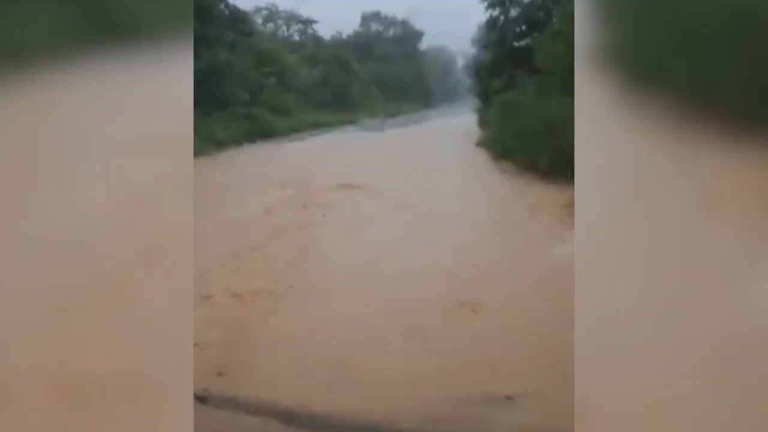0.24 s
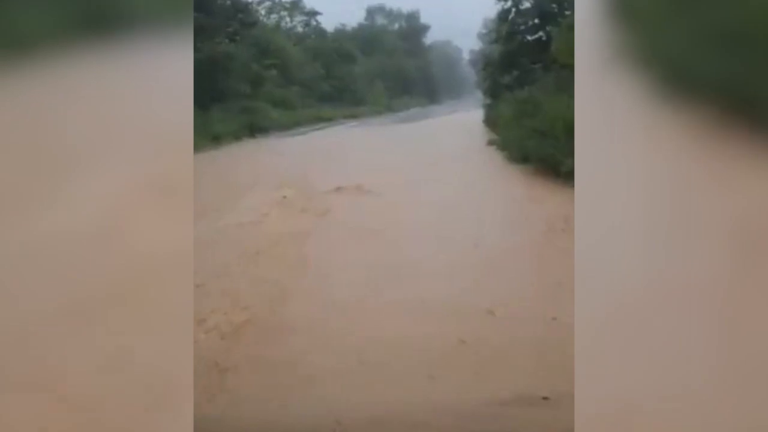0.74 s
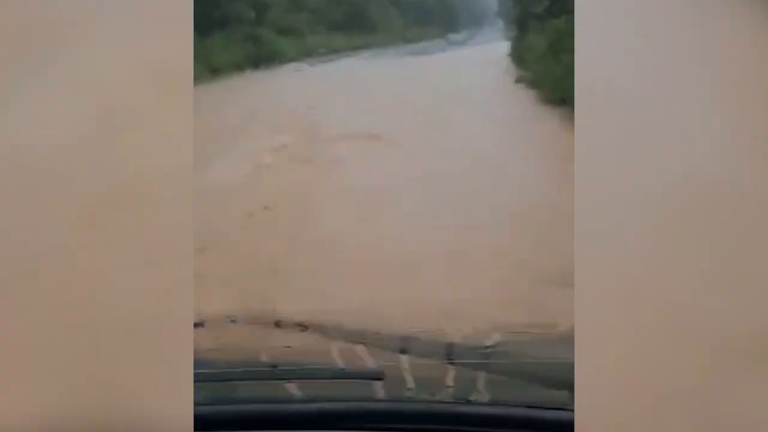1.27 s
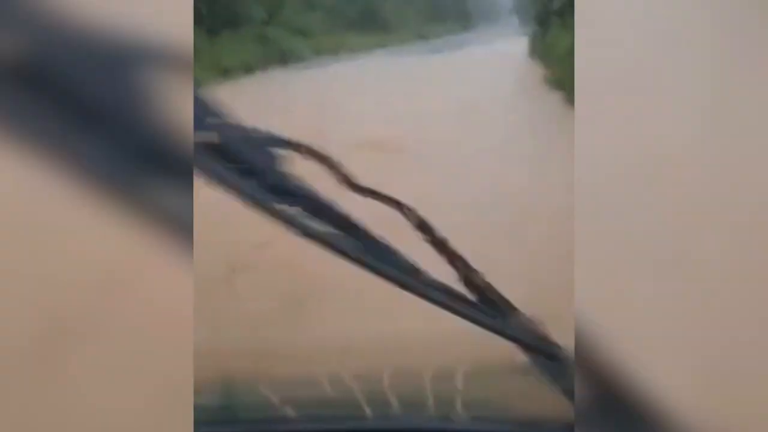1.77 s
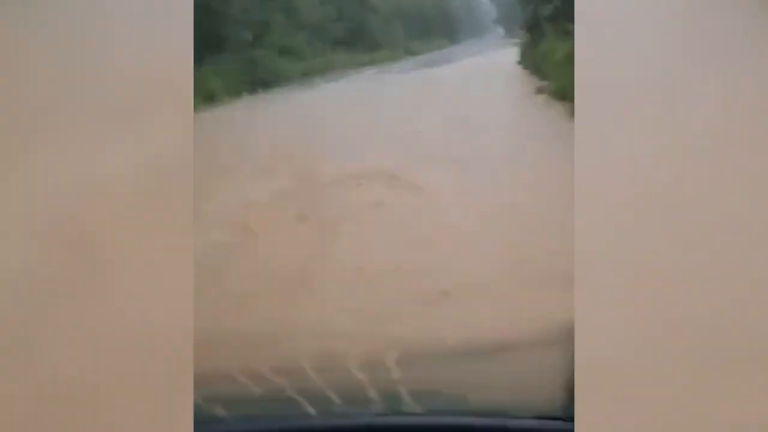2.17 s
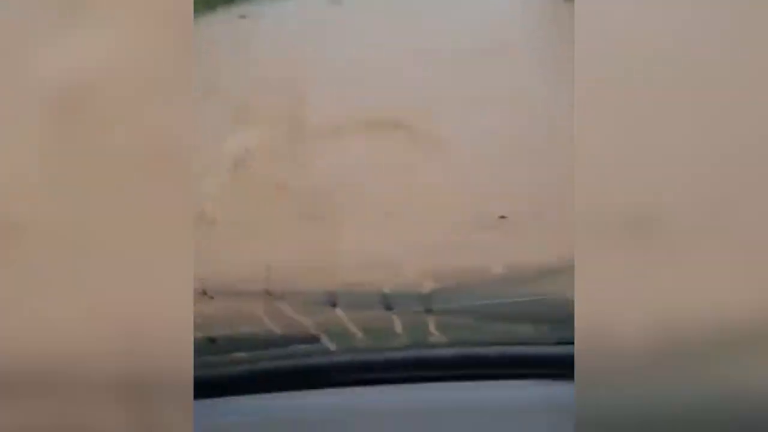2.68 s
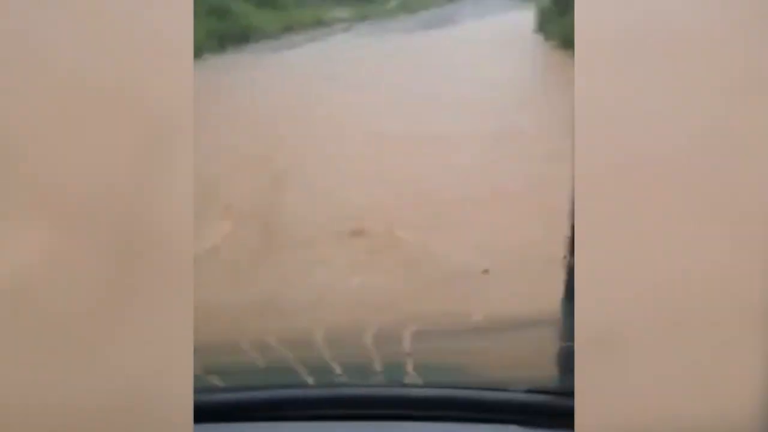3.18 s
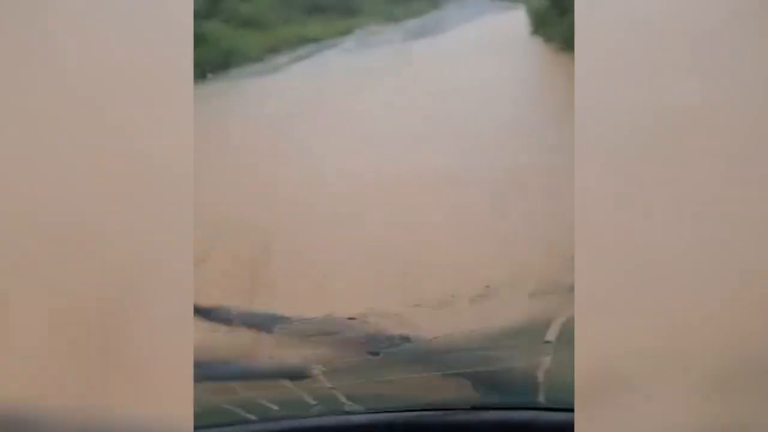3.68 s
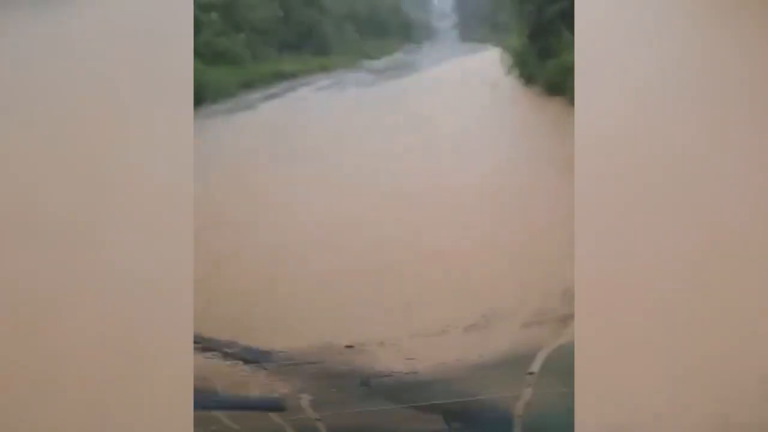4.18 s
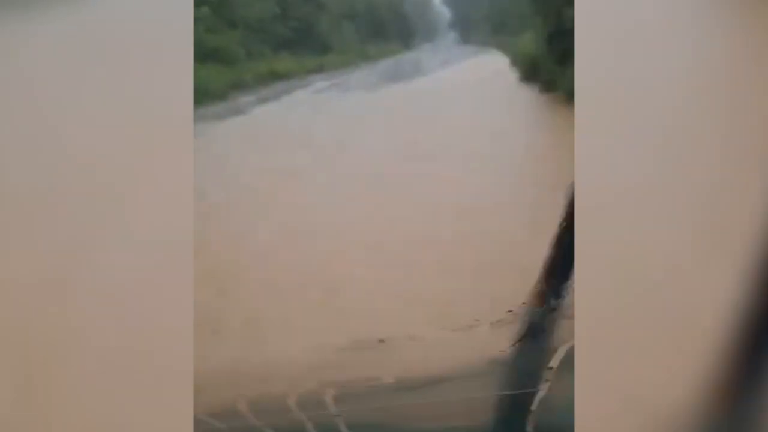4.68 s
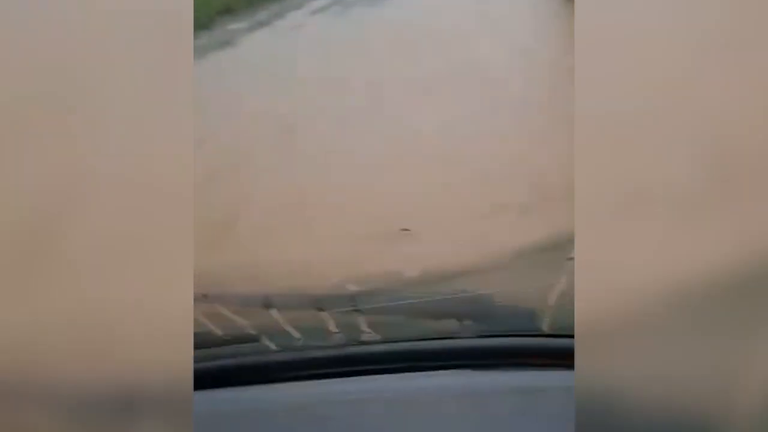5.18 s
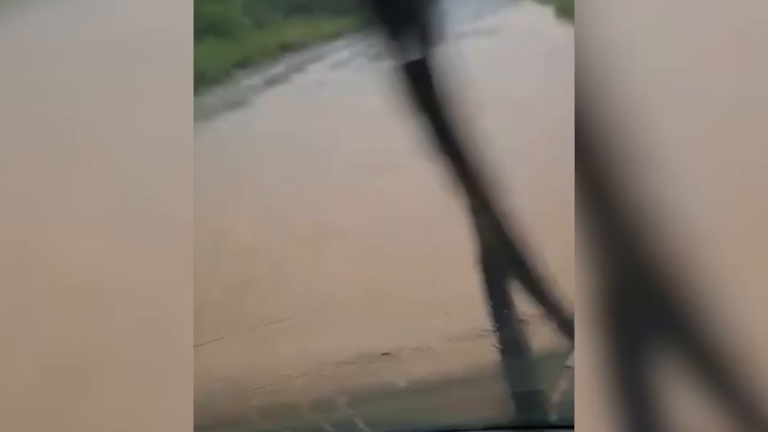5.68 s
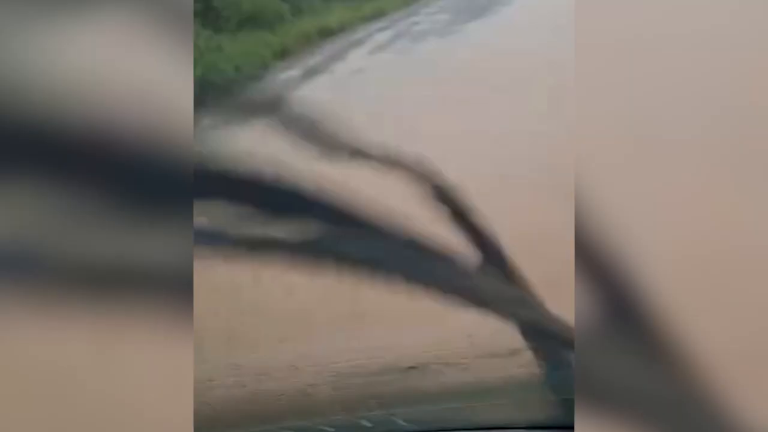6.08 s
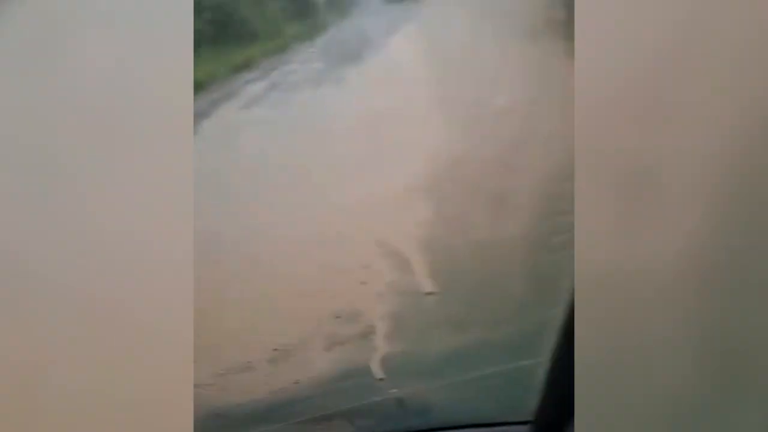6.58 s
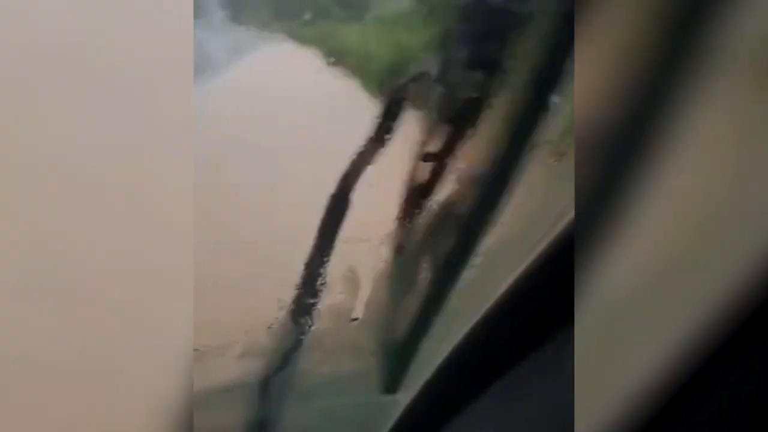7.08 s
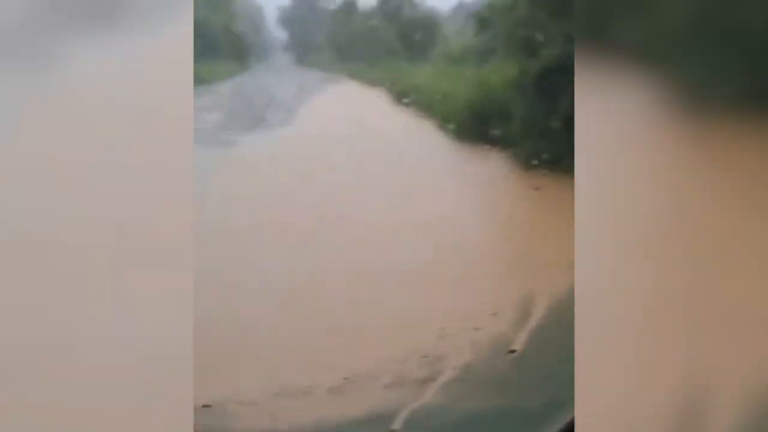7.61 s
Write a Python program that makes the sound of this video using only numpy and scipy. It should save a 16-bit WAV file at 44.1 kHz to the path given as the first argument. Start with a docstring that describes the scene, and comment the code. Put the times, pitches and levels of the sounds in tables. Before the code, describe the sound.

Inside a small, padded car cabin, water drags under the floor and along the doors with a continuous deep rumble and wash. A low engine drone swells unevenly, climbing slightly in pitch before easing near the end. Close to the microphone, dull splashes knock against the body among short trim squeaks and light metallic ticks. Wipers pass with faint swishes, rubber scrapes and a few soft thumps, and a thin whine appears twice.

```python
"""An engine's firing tone booms over the rumble and hiss of water dragging along a car as it creeps down
a flooded road. Heard on a phone microphone inside the closed cabin, a small padded space. Close by, slops
of water slap the body, trim rubs and squeaks, and something small and metal jingles. The wipers swish,
their rubber scrapes and their arms thump as they reverse. Twice a faint whine swells and fades."""
import sys
import numpy as np
from scipy import signal
from scipy.fft import rfft, irfft
from scipy.io import wavfile
from scipy.ndimage import uniform_filter1d

SR = 44100
rng = np.random.default_rng(int(sys.argv[2]) if len(sys.argv) > 2 else 0)


def unload_audio(sound):
    """Save the sound as a 16-bit wav file, at the path given as the first command line argument."""
    columns = np.transpose(np.atleast_2d(sound))
    # keep every value between -1 and 1, then stretch to whole-number steps
    steps = np.round(np.clip(columns, -1, 1) * 32767)
    wavfile.write(sys.argv[1], SR, steps.astype(np.int16))


N = 346185

# the engine's firing tone: t/s, f/Hz, level/dB
FIRING = [(0, 38.08, -24.5), (.3, 37.82, -18), (.9, 37.33, -27), (1.9, 41.06, -20.5), (2.2, 46.98, -11),
          (2.38, 48.17, -24.5), (2.85, 51.2, -18.5), (3.1, 50.2, -29), (3.4, 49.17, -20.5),
          (4.0, 45.97, -36), (4.28, 48.51, -17), (4.9, 50.65, -20), (5.1, 60.33, -23.5), (5.4, 60.05, -16),
          (5.65, 56.9, -11), (6.2, 51.68, -36.5), (6.7, 49.9, -34.5), (7.35, 48.26, -25), (7.65, 48.4, -18),
          (7.85, 47.13, -23)]
# cabin resonances that lift the tone's multiples: f/Hz, width/Hz, level/dB
CABIN_RESONANCES = [(77, 21, -6), (192.2, 29.7, -13.5), (270, 27, -25.5)]
# water under the floor and along the doors: t/s, rumble level/dB, wash level/dB
WADING = [(0, -25, -38), (.35, -24, -42), (1.35, -27.5, -44.5), (1.7, -23.5, -38.5), (2.4, -23, -41.5),
          (2.7, -23.5, -42.5), (3.0, -19.5, -33), (3.22, -25.5, -40), (3.6, -19.5, -41), (3.92, -27, -46.5),
          (4.44, -20.5, -39), (5.15, -20.5, -41), (5.85, -19.5, -36.5), (6.55, -27, -46.5),
          (7.11, -29.5, -48.5), (7.3, -23, -41.5), (7.85, -21.5, -41.5)]
# spectrum of the floor pan's rumble: f/Hz, level/dB
PAN_SPECTRUM = [(13, -39), (22, -12), (38, -4.5), (59, -0.5), (129, -10.5), (187, -11.5), (250, -22),
                (447, -36), (700, -49.5), (910, -65)]
# spectrum of the wash along the doors: f/Hz, level/dB
WASH_SPECTRUM = [(180, -28.5), (300, 1), (884, -10.5), (1600, -15.5), (4380, -24), (6280, -31.5),
                 (7460, -33), (8870, -35), (9400, -68)]
# water slaps the body: t/s, level/dB, slap's noise-band centre f/Hz, relative spray level/dB
BODY_SLAPS = [(0.205, -34, 600, -12), (0.392, -24, 670, -24), (0.861, -32.5, 970, -28),
              (1.122, -39, 688, -13), (1.474, -34, 958, -19), (1.641, -27.5, 770, -22),
              (1.811, -21.5, 745, -26), (2.329, -20.5, 816.6, -19.5), (2.37, -27.5, 728.6, -21),
              (2.419, -21.5, 696, -17), (2.469, -24.5, 700, -30), (2.712, -31, 654, -14.5),
              (2.898, -22.5, 596, -21.5), (2.949, -19.5, 726, -20.5), (2.994, -20.5, 1040, -24.5),
              (3.095, -34, 770, -9.5), (3.399, -25, 600.5, -33), (3.428, -26.5, 870, -23),
              (3.565, -26, 699, -17.5), (3.613, -28, 931, -34), (3.773, -31.5, 951, -22),
              (4.362, -27, 1160, -38), (4.41, -33, 800, -25), (4.47, -31, 1096, -15),
              (4.51, -28, 1000, -18), (4.59, -30, 710, -30), (4.69, -31.5, 741, -23),
              (5.18, -37, 897.4, -17), (5.335, -32, 1000, -22), (4.751, -27, 705, -11),
              (4.807, -21, 698, -19.5), (4.846, -27.5, 1570, -28), (5.056, -30.5, 1200, -18),
              (5.306, -22, 636.7, -21), (5.467, -29, 990, -32), (5.649, -33, 700.4, -28),
              (5.754, -24.5, 1146, -11), (5.808, -17.5, 1187, -19.5), (5.871, -21, 1232, -19),
              (5.941, -40, 651.6, -1), (6.049, -27, 823, -17.5), (6.118, -25.5, 1560, -18.5),
              (6.178, -33, 878, -31), (6.486, -34, 588.4, -21.5), (7.215, -33, 833, -22),
              (7.252, -38, 677, -10.5), (7.45, -34, 902, -12), (7.515, -31, 633.8, -17.5),
              (7.685, -35.5, 597.6, -9.5)]
# trim rubs on trim: t/s, level/dB, f/Hz
TRIM_SQUEAKS = [(0.352, -38, 2300), (0.672, -36.5, 1629), (0.724, -36.5, 1830), (1.642, -34, 1680),
                (1.655, -37, 1740), (1.681, -47, 2850), (1.773, -29.5, 1796), (1.813, -34.5, 3270),
                (2.255, -35, 1746), (2.419, -28, 1820), (2.483, -23, 1823), (2.691, -32.5, 1785),
                (3.111, -28, 1822), (3.579, -23, 1810), (3.808, -27, 1831), (4.138, -37.5, 1635),
                (4.258, -34.5, 1686), (4.301, -28.5, 1683), (4.481, -36, 1599), (4.511, -34, 1710),
                (4.589, -39, 1731), (5.206, -36, 1850), (5.335, -37, 2850), (6.116, -33, 1720),
                (6.208, -33.5, 1798), (6.249, -36.5, 1810), (6.496, -30.5, 1826), (7.186, -44, 2297),
                (7.209, -37, 1835), (7.274, -32.5, 1814), (7.388, -46, 2322), (7.447, -40.5, 2290),
                (7.812, -36.5, 1763)]
# softer squeaks are duller: multiple, drop below the tone/(dB per dB of softness)
TRIM_OVERTONES = [(2, .7), (3, .65)]
# loose metal taps: t/s, level/dB
METAL_TAPS = [(0.6873, -44), (0.8305, -46), (4.5186, -39), (5.8267, -37), (5.9414, -51), (6.1215, -43),
              (6.2482, -46), (6.338, -41), (6.4792, -46), (6.54, -41), (6.7166, -53), (6.8803, -43),
              (6.9072, -47.5), (7.5198, -38), (7.6919, -42)]
# modes of the loose metal: f/Hz, level/dB, t60/s
METAL_MODES = [(7560, 0, 0.04), (7400, -9, 0.025)]
# wiper swishes: t/s, length/s, level/dB, final f/Hz
WIPER_SWISHES = [(0.844, 0.056, -42.5, 3770), (2.116, 0.044, -44.5, 3960), (3.398, 0.041, -39, 3180),
                 (4.664, 0.051, -43, 3800), (7.209, 0.057, -43, 4510)]
# scrapes of the wiper rubber: t/s, level/dB, f/Hz, length/s
WIPER_SCRAPES = [(0.89, -41, 5800, 0.0091), (2.722, -49, 4560, 0.065), (2.724, -49, 6400, 0.04),
                 (3.097, -38, 5970, 0.0075), (4.835, -44, 6014, 0.0096)]
# wiper arms reverse: t/s, push level/dB
WIPER_TURNS = [(1.507, -11), (2.805, -11), (4.855, -15.5)]
# modes of the scuttle panel below the windscreen: f/Hz, level/dB, t60/s
SCUTTLE_MODES = [(69.9, -0.5, 0.9), (120, 0.5, 0.3), (170, -1, 0.24), (211.5, 1, 0.19)]
# faint whines, one list each: t/s, f/Hz, level/dB
WHINE_GLIDES = [
    [(3.05, 531, -75), (3.2, 529, -44), (3.35, 541, -45), (3.6, 529, -44), (3.72, 510, -74.5)],
    [(5.2, 300, -72), (5.36, 295, -35), (5.55, 283, -35), (5.82, 285, -35), (6.0, 266, -33),
     (6.15, 260, -70)],
]


def undb(db):
    """Decibels to gain."""
    return 10 ** (np.asarray(db) / 20)


def unit(x):
    """Scaled to rms 1."""
    return x / np.sqrt(np.mean(x ** 2))


def curve(table):
    """Columns of a (t/s, ..) table, one value per sample."""
    s, *columns = np.transpose(table)
    return [np.interp(np.arange(N) / SR, s, c) for c in columns]


def walk(rate):
    """Random levels held 1 / rate s and slewed twice; spread near 1."""
    hold = int(SR / rate)
    steps = np.repeat(rng.standard_normal(N // hold + 1), hold)
    return 1.312 * uniform_filter1d(uniform_filter1d(steps, hold), hold)[:N]


def shaped_noise(spectrum):
    """Noise with a spectrum of (f/Hz, level/dB) points, rms 1."""
    hz, db = np.transpose(spectrum)
    log_hz = np.log(np.fft.rfftfreq(N, 1 / SR) + 1)
    gain = undb(np.interp(log_hz, np.log(hz), db, left=-80, right=-80))
    return unit(irfft(rfft(rng.standard_normal(N)) * gain, N))


def band(x, lo_hz, hi_hz):
    """Gentle band-pass, rms 1."""
    return unit(signal.sosfilt(signal.butter(2, [lo_hz, hi_hz], "bandpass", fs=SR, output="sos"), x))


def blows(s, db):
    """One impulse at each moment."""
    x = np.zeros(N)
    np.add.at(x, (np.asarray(s) * SR).astype(int) % N, undb(db))
    return x


def ring(x, modes):
    """Decaying modes (f/Hz, level/dB, t60/s) struck by x."""
    out = 0
    for hz, db, t60 in modes:
        pole = np.exp(2j * np.pi * hz / SR - np.log(1000) / (t60 * SR))
        out = out + undb(db) * signal.lfilter([1], [1, -pole], x).imag
    return out


def engine(harmonics=8, waver_db=3.2, wavers_per_s=9):
    """Firing tone, its multiples lifted by cabin resonances; uneven combustion makes them all waver."""
    hz, db = curve(FIRING)
    phase = 2 * np.pi * np.cumsum(hz * (1 + 0.01156 * walk(20))) / SR
    upper = 0
    for k in range(2, harmonics + 1):
        lift = sum(undb(d) / (1 + (2 * (k * hz - f) / w) ** 2) for f, w, d in CABIN_RESONANCES)
        upper = upper + lift * undb(3.24 * walk(8.1)) * np.sin(k * phase)
    # the multiples swell less than the firing tone, which booms in the whole body
    upper_db = np.mean(db) + 0.4 * (db - np.mean(db))
    boom = undb(db + waver_db * walk(wavers_per_s)) * np.sin(phase)
    return np.sqrt(2) * (boom + undb(upper_db) * upper)


def floor_rumble(db):
    """Below the microphone, turbulent water drags on the floor pan in uneven throbs."""
    return undb(db + 2.0 + 1.87 * walk(12)) * shaped_noise(PAN_SPECTRUM)


def slops(per_s, scatter_db=1.0, t60_s=0.075, rise_s=0.0033):
    """Envelope of many small random slops of water that swell fast and die away."""
    when, size = rng.random((int(per_s * N / SR), 2)).T
    starts = blows(when * N / SR, -scatter_db * np.log(1 - size))
    swell = uniform_filter1d(starts, int(rise_s * SR))
    return unit(signal.lfilter([1], [1, -np.exp(-np.log(1000) / (t60_s * SR))], swell))


def door_wash(db):
    """Water hisses along the doors; big slops lift every band, small ones only their own."""
    big_slops = slops(per_s=55)
    spectrum = rfft(shaped_noise(WASH_SPECTRUM))
    octave = np.log2(np.fft.rfftfreq(N, 1 / SR) / 250 + 1e-9)  # above 250 Hz
    out = 0
    for centre in np.arange(0, 6, .5):
        share = np.cos(np.pi * np.clip(octave - centre, -.5, .5)) ** 2
        out = out + (0.42 + 0.43 * big_slops + 0.36 * slops(per_s=30)) * irfft(spectrum * share, N)
    return undb(db) * unit(out)


def water_slaps(t60_s=0.13, rise_s=0.0025, spray_rise_s=.009, knock_decay_s=0.022, width=0.41):
    """Water hits the body: a short, dull knock of band noise, a splat, spray rattling a loose part."""
    noise = rng.standard_normal(N)
    splat = band(noise, 370, 1500) * undb(2.5 * np.tanh(walk(120)))
    spray = band(rng.standard_normal(N), 1100, 6000) * undb(5.4 * np.tanh(walk(120)))
    parts_hz = 1900 + 1600 * rng.random(len(BODY_SLAPS))
    out = np.zeros(N)
    for (s, db, knock_hz, spray_db), part_hz in zip(BODY_SLAPS, parts_hz):
        at = np.arange(int(s * SR), min(int(s * SR) + SR // 4, N))
        t = np.arange(len(at)) / SR
        shape = (1 - np.exp(-t / rise_s)) * np.exp(-np.log(1000) * t / t60_s)
        # read backwards, so that each band is in full swing from its first moment
        knock, part = (band(noise[at], f * (1 - width / 2), f * (1 + width / 2))[::-1]
                       for f in (knock_hz, part_hz))
        # the knock comes at once and stops sooner than the splat; the spray swells later
        knock = knock * undb(-6) * np.exp(-t / knock_decay_s)
        drops = 2 * (spray[at] + undb(-6) * part) * (1 - np.exp(-t / spray_rise_s))
        out[at] += undb(db) * shape * (knock + undb(-8) * splat[at] + undb(spray_db) * drops)
    return out


def rub(rows, overtones=(), flutter_db=7, wobble=0.032, catch_db=0, catch_s=.008):
    """Stick-slip tones (t/s, level/dB, f/Hz, length/s); the grip flutters and may catch in quick beats."""
    out, t = np.zeros(N), np.arange(SR // 10) / SR
    grip, slip = np.tanh(0.77 * walk(320)), walk(500)
    for (s, db, hz, length), pace in zip(rows, .7 + .6 * rng.random(len(rows))):
        at = (int(s * SR) + np.arange(len(t))) % N
        catch = -catch_db * np.cos(np.pi * (.2 + t / (pace * catch_s))) ** 2
        shape = (1 - np.exp(-t / .001)) * np.exp(-(t / length) ** 2)
        phase = 2 * np.pi * hz * np.cumsum(1 + wobble * slip[at]) / SR
        upper = sum(undb(drop * db) * np.sin(k * phase) for k, drop in overtones)
        out[at] += undb(db + flutter_db * grip[at] + catch) * shape * (np.sin(phase) + upper)
    return out


def trim_squeaks(wash_db, squeak_s=.016, creaks_per_s=70):
    """Nearby trim squeaks clearly over many faint creaks that grow as the water shakes the body."""
    when, size, pitch = rng.random((int(creaks_per_s * N / SR), 3)).T
    creak_db = wash_db[(when * N).astype(int)] - 13.0 + 7 * size ** 2
    creak_rows = np.c_[when * N / SR, creak_db, 1450 + 1100 * pitch ** 1.8, .007 + .006 * size]
    squeak_rows = np.c_[TRIM_SQUEAKS, np.full(len(TRIM_SQUEAKS), squeak_s)]
    squeaks = rub(squeak_rows, TRIM_OVERTONES, flutter_db=3.5, wobble=.017, catch_db=7)
    return squeaks + rub(creak_rows, TRIM_OVERTONES)


def metal_jingles(chatter_per_s=45, rattle_s=.012):
    """Loose metal rings: clear taps over a steady faint chatter, each tap a short rattle."""
    when, size = rng.random((int(chatter_per_s * N / SR), 2)).T
    chatter = blows(when * N / SR, -66 - 3.3 * np.log(1 - size))
    taps = blows(*np.transpose(METAL_TAPS))
    rattle = uniform_filter1d(taps + chatter, int(rattle_s * SR)) * rng.standard_normal(N)
    return undb(27.0) * ring(rattle, METAL_MODES)


def wiper_swishes(first_hz=2200, half_width_hz=1100, stop_s=0.0055):
    """The wipers sweep: a band of hiss slides upward while it swells, then stops short."""
    out, t = np.zeros(N), np.arange(SR // 8) / SR
    lowpass = signal.butter(2, half_width_hz, fs=SR, output="sos")
    hiss = unit(signal.sosfilt(lowpass, rng.standard_normal(N)))
    for s, length, db, last_hz in WIPER_SWISHES:
        at = int(s * SR) + np.arange(len(t))
        progress = np.clip(t / length, 0, 1)
        shape = np.clip(4 * progress, 0, 1) * np.exp(-np.clip(t - length, 0, None) / stop_s)
        hz = first_hz * (last_hz / first_hz) ** progress
        out[at] += undb(db) * shape * hiss[at] * np.sin(2 * np.pi * np.cumsum(hz) / SR)
    return out


def wiper_scrapes():
    """The rubber sticks and slips on the glass in thin, high tones."""
    return rub(WIPER_SCRAPES, wobble=0.0072)


def wiper_thumps(push_s=0.0049):
    """The arms reverse with a soft push that rings the scuttle panel."""
    push = np.hanning(int(push_s * SR))
    turns = blows(*np.transpose(WIPER_TURNS))
    return ring(np.convolve(turns, push / push.sum())[:N], SCUTTLE_MODES)


def whines():
    """Thin, unsteady tones glide as they swell and fade."""
    out = 0
    for hz, db in map(curve, WHINE_GLIDES):
        gain = undb(db + 2.7 * walk(25))
        phase = 2 * np.pi * np.cumsum(hz * (1 + .012 * walk(15))) / SR
        out = out + gain * np.sin(phase)
    return out


def cabin(x, t60_s=.12, wet_db=-11):
    """The padded space around the microphone adds a short, dense tail."""
    t = np.arange(SR // 5) / SR
    tail = rng.standard_normal(len(t)) * np.exp(-np.log(1000) * t / t60_s)
    return x + undb(wet_db) * signal.fftconvolve(x, tail / np.sqrt(np.sum(tail ** 2)))[:N]


def scene():
    """One microphone position inside the car; the close, bright sounds carry the cabin's tail."""
    rumble_db, wash_db = curve(WADING)
    near = water_slaps() + trim_squeaks(wash_db) + wiper_scrapes() + metal_jingles() + wiper_swishes()
    body = engine() + whines() + floor_rumble(rumble_db) + wiper_thumps() + door_wash(wash_db)
    return (body + cabin(near))[None]


def record(dry):
    """The phone rounds the loudest peaks and cuts the top above 9150 Hz."""
    rounded = np.tanh(1.267 * dry) / 1.239
    return signal.sosfilt(signal.ellip(10, .2, 80, 9150, fs=SR, output="sos"), rounded)


dry = scene()
out = record(dry)
unload_audio(out)
```